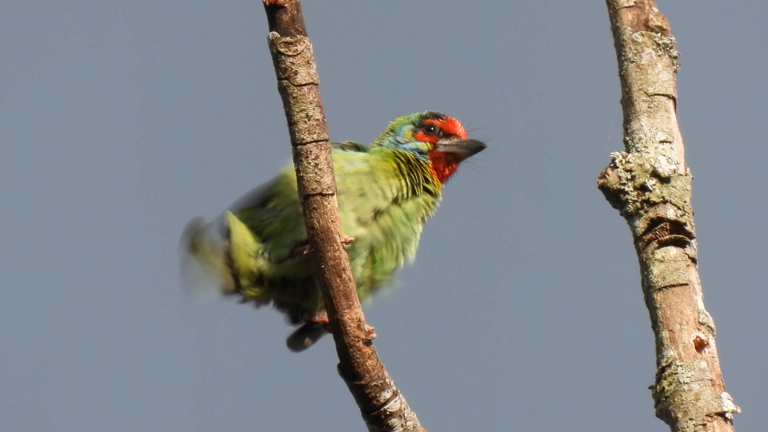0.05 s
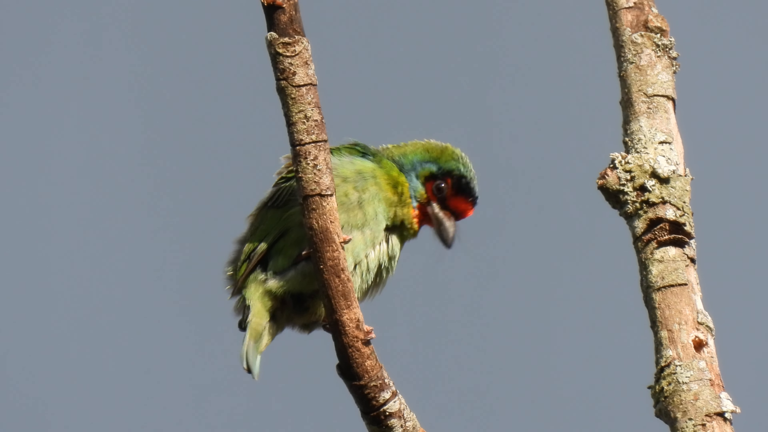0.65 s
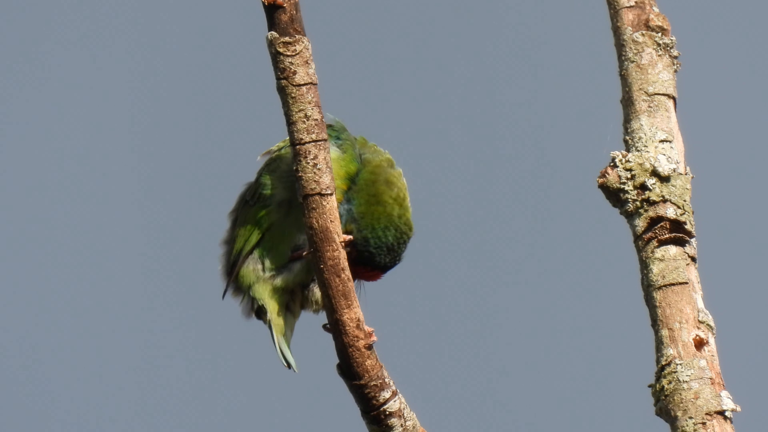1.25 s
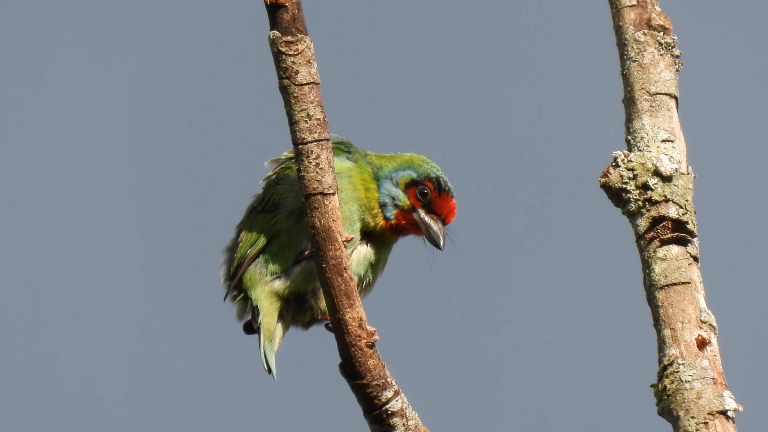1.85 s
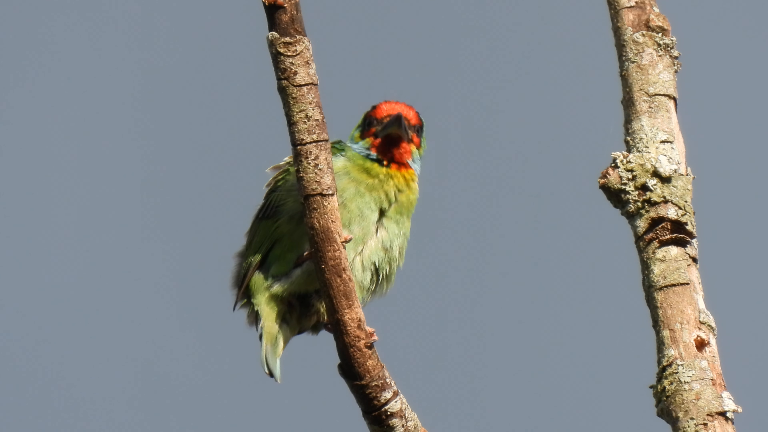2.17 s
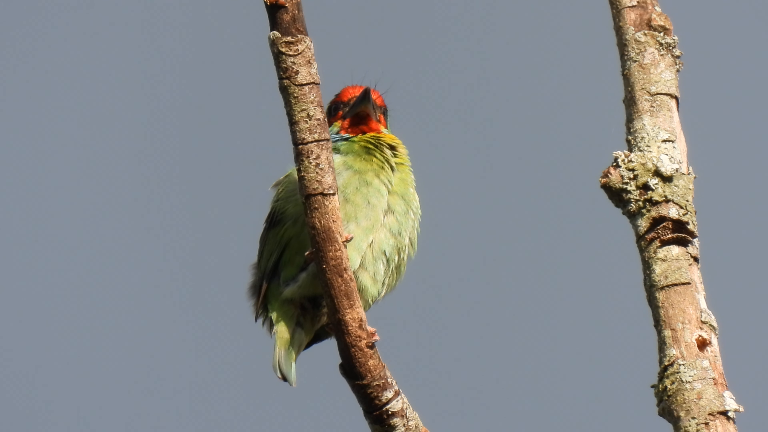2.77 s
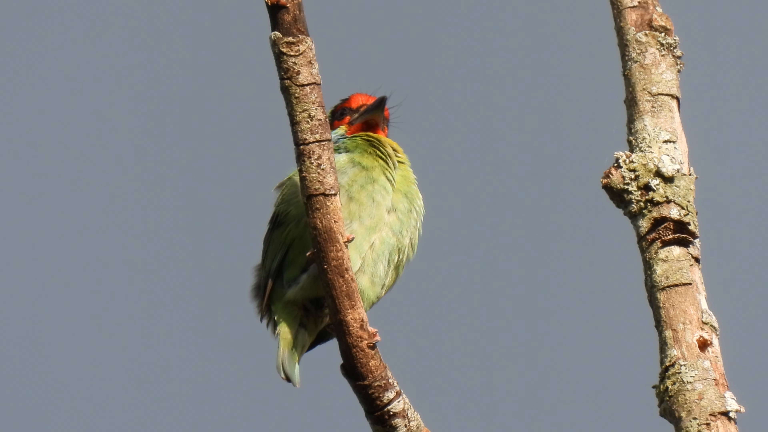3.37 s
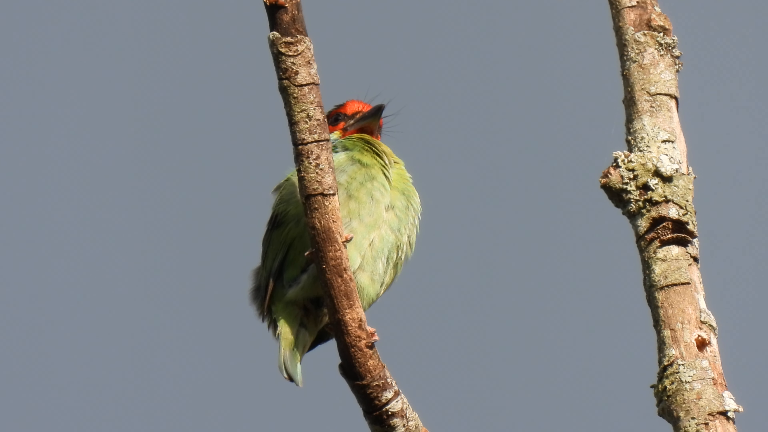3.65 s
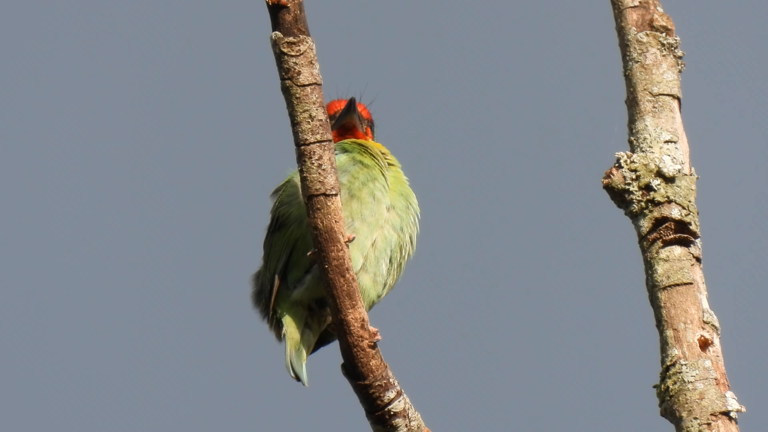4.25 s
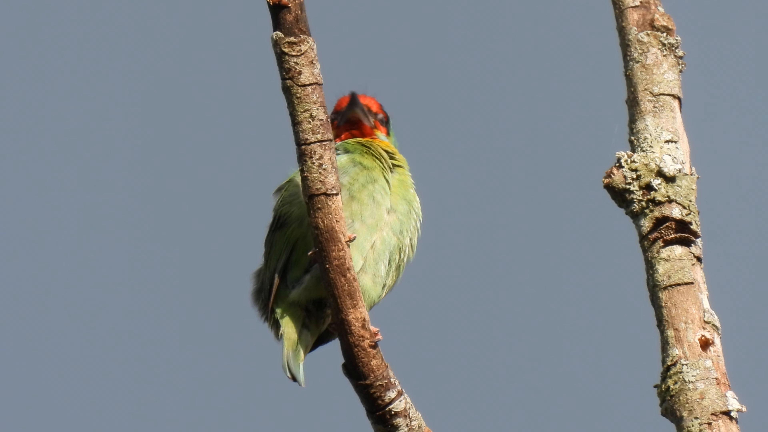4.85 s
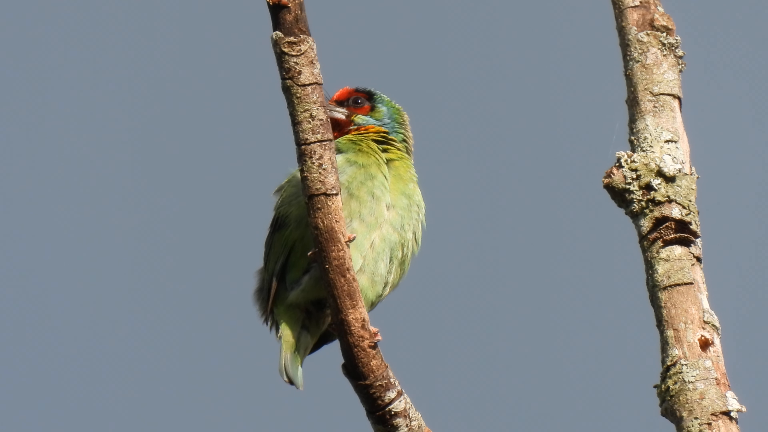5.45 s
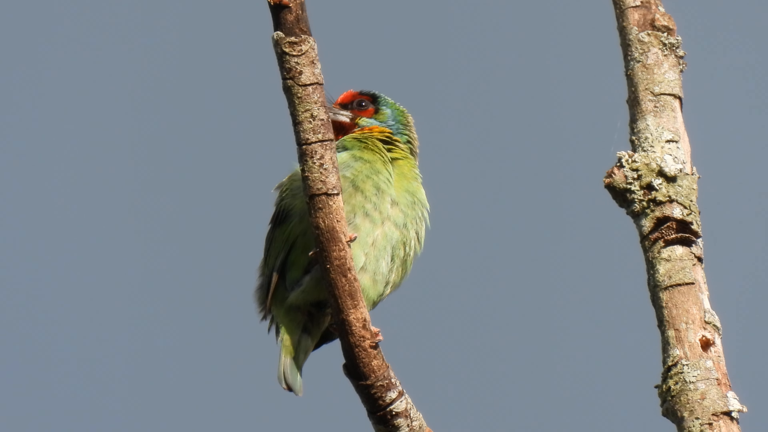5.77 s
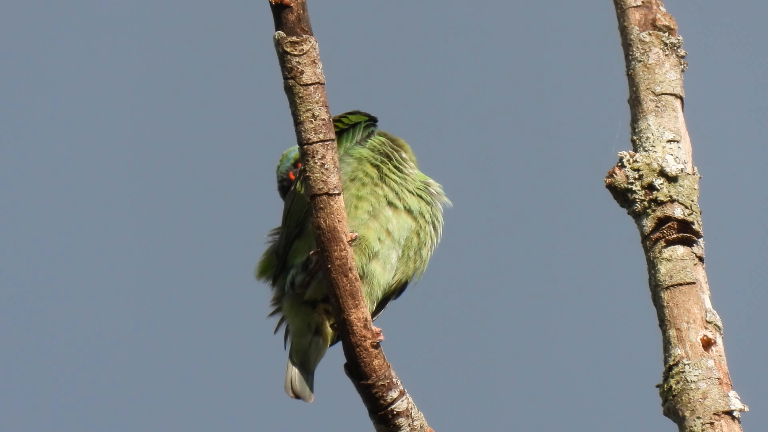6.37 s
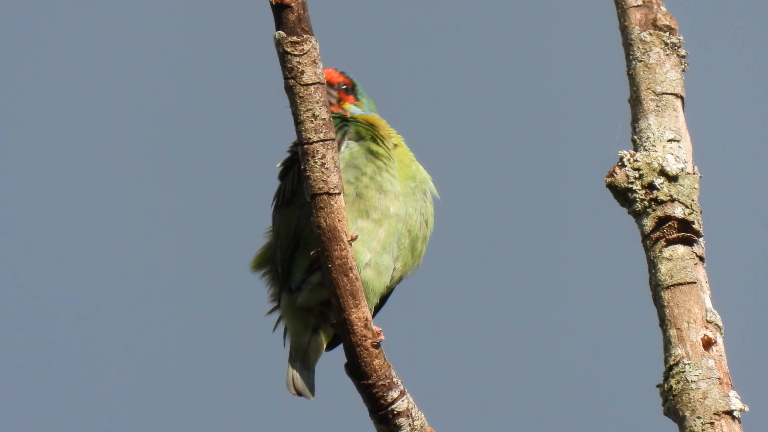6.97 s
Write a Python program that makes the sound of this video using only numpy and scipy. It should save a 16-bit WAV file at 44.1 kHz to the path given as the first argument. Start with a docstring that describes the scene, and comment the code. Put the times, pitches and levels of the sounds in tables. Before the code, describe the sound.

A barbet repeats a short rolling trill in a wood, while small birds chirp faintly over a soft high hiss.

```python
"""A wood. A near barbet repeats a rolling trill, mostly led in by a soft low note; a second answers twice.
Each voice is a swept syrinx tone, its harmonics weighted by the throat, with a breathy rasp.
Small birds chirp and whistle, a far bird hoots, a branch ticks once. Trunks echo and the wood rings on
over a steady hush and high hiss. A noise suppressor pulls the low hush down under every loud call."""
import sys
import numpy as np
from scipy import signal
from scipy.fft import rfft, irfft
from scipy.io import wavfile
from scipy.ndimage import uniform_filter1d

SR = 44100
rng = np.random.default_rng(int(sys.argv[2]) if len(sys.argv) > 2 else 0)


def put_to_file(sound):
    """Save the sound as 16-bit audio at rate SR, in the file named by the first command-line argument."""
    columns = np.atleast_2d(sound).T  # one column per channel
    safe = np.clip(columns, -1, 1)
    whole_steps = np.round(safe * 32767)
    wavfile.write(sys.argv[1], SR, whole_steps.astype(np.int16))


N = 317520

# Distant leaves and air. Each row: frequency in Hz, relative density in dB.
HUSH_SPECTRUM = [(30, -36), (90, -19.5), (150, -16), (240, -1), (500, 1.5), (850, 0), (1600, -0.5),
                 (2600, -3.5), (4500, -4), (6000, -5), (7200, -10.5), (8100, -1), (8800, 2.5), (9500, -19)]
# Stereo likeness of noise. Each row: frequency in Hz, left-right correlation.
NOISE_CORRELATION = [(60, .8), (200, 0.38), (400, 0.49), (1000, 0.55), (2500, 0.14), (5000, 0.05),
                     (9000, 0.049)]
# Ring of the wood. Each row: frequency in Hz, T60 in seconds.
WOOD_T60 = [(500, 0.47), (1150, 1.86), (2600, 0.98), (4500, 1.6), (9000, 1.8)]
# Trunk and ground echoes. Each row: delay in seconds, gain in dB, left minus right in dB.
ECHOES = [(.0048, -31, 3.5), (0.0125, -9.5, -6.5), (0.028, -20, 7), (0.04, -20, -6), (0.068, -16, 8.5)]

# Far chatter, loudest at first. Each row: time in seconds, level in dB.
CHATTER_ENVELOPE = [(0, -36), (.6, -49), (1, -59), (5.5, -51), (6.5, -59)]
# Short bird notes. Each row: start in seconds, length in seconds, middle pitch in Hz, relative level in dB.
HOOTS = [(1.660, 0.047, 850, -55.5), (1.770, 0.063, 850, -56.5), (1.870, 0.067, 859, -54.5),
         (1.985, 0.092, 871, -59.5)]  # low, far
BURRS = [(0, .11, 2667, -51.5), (.168, 0.019, 3580, -40.5), (.25, 0.33, 4710, -63),
         (.405, 0.032, 3490, -52.5), (.553, 0.027, 3410, -51), (1.92, 0.047, 3470, -63),
         (2.17, 0.13, 2596, -65.5), (3.115, 0.043, 3450, -55.5), (3.43, 0.016, 2040, -54.5),
         (3.53, 0.049, 2680, -59.5), (3.583, 0.014, 2860, -50.5), (4.645, 0.024, 2650, -51.5),
         (4.702, 0.021, 2460, -48), (4.99, 0.11, 3400, -57), (5.24, 0.15, 2250, -67.5),
         (5.915, 0.051, 2950, -57), (6.09, 0.11, 2370, -58.5)]  # blurred, deep among the trees
PIPS = [(.012, 0.021, 2550, -42), (.06, 0.094, 3250, -53.5), (.18, 0.014, 2436, -35),
        (.194, 0.015, 4255, -37.5), (.288, 0.027, 3360, -46.5), (.368, 0.044, 2860, -43.5),
        (.431, 0.022, 2503, -34.5), (.606, 0.034, 2675, -39), (.65, 0.094, 2000, -63),
        (.99, 0.062, 2043, -66), (1.175, 0.041, 3980, -53), (1.28, 0.067, 3970, -60.5),
        (3.197, 0.035, 2452, -41.5), (3.238, 0.027, 2613, -43.5), (3.235, 0.023, 2127, -46.5),
        (3.466, 0.029, 2543, -43), (3.745, 0.024, 2478, -44.5), (4.11, 0.061, 3040, -60.5),
        (4.65, .11, 3150, -59.5), (4.702, .025, 2600, -48.5), (4.72, 0.033, 1586, -62),
        (4.835, 0.029, 2380, -53.5), (5.005, 0.059, 2836, -47.5), (5.23, 0.047, 2286, -56),
        (5.728, 0.081, 3378, -55.5), (5.815, 0.062, 3370, -61), (5.935, 0.068, 3330, -58),
        (5.836, 0.035, 2475, -48)]  # nearly level
DOWNSLURS = [(.033, 0.02, 2290, -46), (.133, 0.038, 2824, -35), (.308, 0.032, 2670, -37.5),
             (.388, 0.038, 2795, -34.5), (.622, 0.045, 2830, -36), (3.147, 0.039, 2740, -47.5),
             (4.915, .034, 2846, -51.5), (5.32, 0.023, 2810, -55.5), (5.998, 0.07, 2990, -53.5)]  # gently falling
CHIPS = [(0, 0.0074, 1930, -41), (2.11, 0.035, 2380, -61), (2.285, 0.061, 2295, -66),
         (3.625, 0.01, 3390, -49.5), (3.625, 0.026, 2264, -62.5), (4.917, 0.016, 2040, -53),
         (6.085, 0.058, 2340, -65)]  # sharply falling
# First and last pitch as multiples of the middle pitch.
HOOT_BEND, BURR_BEND = (.93, .98), (1.05, .93)
PIP_BEND, DOWNSLUR_BEND, CHIP_BEND = (1.03, 1.01), (1.035, .94), (1.09, .9)
# Rising notes. Each row: start and length in seconds, first, middle and last pitch in Hz,
# relative level in dB.
UPSLURS = [(0.041, 0.048, 4070, 4500, 4770, -54.5), (0.977, 0.071, 2990, 3350, 4020, -61.5),
           (1.076, 0.04, 3150, 3755, 4150, -56), (1.089, 0.052, 1765, 2280, 2873, -57),
           (1.114, 0.041, 4206, 4730, 5130, -65), (1.138, 0.039, 3135, 3700, 3970, -51.5),
           (2.958, 0.037, 3235, 3875, 4444, -44.5), (3.348, 0.035, 2690, 3200, 3400, -49),
           (3.633, .05, 3910, 4240, 4350, -54), (4.436, 0.028, 2280, 2593, 2950, -44),
           (5.024, 0.044, 2154, 2460, 2730, -58), (5.028, 0.038, 4040, 4560, 5350, -60.5),
           (5.061, 0.075, 3300, 3955, 3990, -55.5), (5.174, 0.034, 3100, 3446, 3787, -58)]
THIN_WHISTLES = [(1.22, .14, 6610, 7110, 7230, -69), (1.977, 0.62, 4196, 4900, 5060, -68.5),
                 (4.804, .6, 4250, 4800, 4820, -70.5)]

# Barbet syrinx. Each row: harmonic number, relative level in dB.
HARMONICS = [(1, 0), (2, -7), (3, -22), (4, -22)]
# Swollen throat, favouring the fundamental. Each row: frequency in Hz, gain in dB.
THROAT_RESPONSE = [(700, 2), (950, -8), (1100, -0.5), (1280, -0.5), (1420, -4), (1700, -26), (1950, -9.5),
                   (2250, -13.5), (2750, -9.5), (3100, -19.5), (4000, -12), (4650, -14.5), (5300, -5.5),
                   (7500, -30)]
# Breath and hoarse bursts. Each row: frequency in Hz, relative density in dB.
RASP_SPECTRUM = [(150, -66), (650, -42.5), (1050, 8.5), (1800, -6.5), (2700, -1), (3400, -8), (4100, -8),
                 (4700, -8.5), (5300, -6.5), (6500, -4), (8000, -14.5)]
CRACK_SPECTRUM = [(300, -46.5), (800, -18.5), (1200, 1), (1600, -3.5), (1950, 2), (2300, -3), (2700, -3.5),
                  (3400, -18), (5300, -14), (8000, -25.5)]
# Second barbet, one list per call. Each row: time in seconds, pitch in Hz, relative level in dB.
ANSWERS = [
    [(.593, 1306, -36), (.604, 1241, -38), (.612, 1015, -29.5), (.622, 982, -31.5), (.638, 1140, -37),
     (.657, 1061, -54), (.674, 1148, -30.5), (.692, 1077, -51), (.712, 1122, -30.5), (.725, 1051, -35),
     (.742, 1113, -31.5), (.77, 1083, -45)],
    [(6.768, 1250, -43.5), (6.78, 1125, -48.5), (6.795, 942, -33), (6.808, 1126, -54), (6.818, 1050, -33),
     (6.83, 998, -37), (6.845, 1154, -35.5), (6.86, 990, -27), (6.872, 1029, -36), (6.885, 1161, -37),
     (6.905, 997, -39.5), (6.922, 1120, -41.5), (6.945, 1060, -59)],
]
# Soft lead-in note. Each row: offset in seconds, pitch in Hz, relative level in dB.
LEAD_IN = [(-.008, 1199, -16.5), (.004, 1027, 1.5), (.02, 987.4, -4), (.04, 955, -7.5), (0.059, 900, -8),
           (.085, 982, -10), (.1, 900, -15.5)]
# Caller's trills. Each row: start in seconds, pitch shift in Hz, time stretch, six roll levels in dB.
# The stretch scales the offsets in the next four tables.
TRILLS = [(.073, -4, 1.05, -33, -30, -28, -28.5, -34.5, -32),
          (1.469, 5, 1.04, -30.5, -29.5, -26.5, -27.5, -32, -34),
          (2.811, 8, 0.99, -30, -29, -27, -26.5, -29, -30),
          (4.169, -5, 1, -34, -31.5, -28.5, -29, -29.5, -27.5),
          (5.571, -14.5, .97, -31.5, -28.5, -30, -27.5, -28.5, -30),
          (6.992, -3.5, 0.98, -32.5, -31, -28.5, -29, -28.5, -35.5)]
# Hoarse bursts in a trill. Each row: offset in seconds, level in dB.
CRACKS = [(-.143, -56), (.001, -43), (.035, -46.5), (0.077, -45), (.116, -48), (.154, -54)]
# Rolls, narrowing along a trill. Each row: offset of the top in seconds, first, top and last pitch in Hz.
ROLLS = [(.009, 960, 1400, 1100), (.044, 1130, 1400, 1060), (.084, 980, 1375, 1070),
         (.122, 980, 1355, 1080), (.161, 1090, 1320, 1110), (.198, 1130, 1265, 1170)]
# One roll. Each row: offset from the top in seconds, share of the pitch swing, relative level in dB.
ROLL_ARCH = [(-.011, 0, -14), (-.005, .7, -8), (0, 1, -1.5), (.005, .82, 3), (.012, .25, -.5),
             (.017, .04, -2.5), (.023, 0, -9)]
# Drooping end of a trill. Each row: offset in seconds, pitch in Hz, level in dB against the last roll.
TRILL_ENDING = [(.228, 1173, -5), (0.247, 1141, -3.5), (0.26, 1020, -18), (.272, 932, -33)]

# Suppressor threshold. Each row: frequency in Hz, level in dB against the whole sound.
GATE_THRESHOLD = [(40, -50), (150, -47), (400, -43.5), (720, -44.5), (840, -67.5), (1100, -110)]

BARBET_PAN_DB, SONGBIRD_PAN_DB = .26, 2.5  # left minus right


def from_db(db):
    return 10 ** (np.asarray(db) / 20)


def at_hz(points, hz):
    """Interpolate along log frequency."""
    known_hz, values = np.transpose(points)
    return np.interp(np.log(np.maximum(hz, 1)), np.log(known_hz), values)


def panned(mono, pan_db):
    return mono * from_db([[pan_db / 2], [-pan_db / 2]])


def add(out, start_s, sound):
    at = max(0, round(start_s * SR))
    out[:, at:at + sound.shape[1]] += sound[:, :max(0, N - at)]


def flutter(size, rate_hz):
    """Smooth random wander, spread about 1."""
    return np.interp(np.arange(size) * rate_hz / SR, np.arange(1024), rng.standard_normal(1024))


def stereo_noise(size, spectrum, correlation=NOISE_CORRELATION):
    """Coloured, partly correlated noise, rms 1."""
    hz = np.fft.rfftfreq(size, 1 / SR)
    mid, side = rfft(rng.standard_normal((2, size)))
    alike = np.clip(at_hz(correlation, hz), -1, 1)
    both = np.sqrt(1 + alike) * mid + np.sqrt(1 - alike) * side * [[1], [-1]]
    noise = irfft(both * from_db(at_hz(spectrum, hz)), size)
    return noise / np.sqrt(np.mean(noise ** 2) + 1e-20)


def hush(level_db=-56, waver_db=.5):
    """Distant leaves and air, with a high hiss."""
    return stereo_noise(N, HUSH_SPECTRUM) * from_db(level_db + waver_db * flutter(N, rate_hz=11))


def wood_reverb(x, near_db, near_t60_s, far_db, correlation):
    """Scatter from near branches dies fast; the wood beyond rings on."""
    t = np.arange(2 * SR) / SR
    edges_hz = np.geomspace(500, 10000, 7)
    noises = [stereo_noise(len(t), [(100, 0)], [(100, correlation)]) for _ in range(2)]  # white
    near = from_db(-60 * t / near_t60_s) * (1 - np.exp(-t / .0037))
    near *= from_db(near_db) / np.linalg.norm(near)
    response = 0
    for k, (low_hz, high_hz) in enumerate(zip(edges_hz, edges_hz[1:])):
        bandpass = signal.butter(2, [low_hz, high_hz], "band", fs=SR, output="sos")
        far_t60_s = at_hz(WOOD_T60, np.sqrt(low_hz * high_hz))
        far = from_db(-60 * t / far_t60_s) * (1 - np.exp(-t / .034))
        far *= from_db(far_db) / np.linalg.norm(far)
        response += signal.sosfilt(bandpass, noises[k % 2]) * (near + far)
    return signal.fftconvolve(x, response, axes=1)[:, :N]


def trunk_echoes(x):
    """Direct sound plus reflections from trunks and ground."""
    out = x.copy()
    for delay_s, gain_db, pan_db in ECHOES:
        add(out, delay_s, panned(x, pan_db) * from_db(gain_db))
    return out


def branch_tick(start_s=5.478, level_db=-49, decay_s=.002):
    """One tiny, dry snap in the branches."""
    out = np.zeros((2, N))
    t = np.arange(SR // 20) / SR
    snap = stereo_noise(len(t), spectrum=[(2000, -20), (5000, 0), (10000, -3)])
    add(out, start_s, snap * from_db(level_db) * np.exp(-t / decay_s))
    return out


def whistles(notes, jitter, shimmer_db, buzz=0, full_buzz_hz_per_s=45000):
    """Near-pure tones bent through three pitches; buzz adds jitter to steep sweeps."""
    out = np.zeros((2, N))
    for start_s, length_s, first_hz, middle_hz, last_hz, level_db, pan_db in notes:
        size = max(64, round(length_s * SR))
        parabola = np.polyfit([0, .5, 1], [first_hz, middle_hz, last_hz], 2)
        steepness = min(1, abs(last_hz - first_hz) / length_s / full_buzz_hz_per_s) ** 4
        hz = np.polyval(parabola, np.linspace(0, 1, size))
        hz *= 1 + (jitter + buzz * steepness) * flutter(size, 900)
        envelope = signal.windows.tukey(size, .6) * from_db(level_db + shimmer_db * flutter(size, 150))
        tone = np.sqrt(2) * np.sin(2 * np.pi * np.cumsum(hz) / SR)
        add(out, start_s, panned(envelope * tone, pan_db))
    return out


def bent(notes, bend):
    """Expand each note's pitch to first, middle and last; append the pan."""
    return [(start_s, length_s, hz * bend[0], hz, hz * bend[1], db, SONGBIRD_PAN_DB)
            for start_s, length_s, hz, db in notes]


def with_pan(notes):
    return [(*note, SONGBIRD_PAN_DB) for note in notes]


def far_chatter(count, low_hz, high_hz):
    """Random chirps of birds deep in the wood."""
    notes = []
    for k, (when, span, height, sweep, faintness) in enumerate(rng.random((count, 5))):
        start_s, length_s = (k + when) / count * N / SR, .03 + .05 * span
        hz = low_hz * (high_hz / low_hz) ** height
        db = np.interp(start_s, *np.transpose(CHATTER_ENVELOPE)) - 6 * faintness
        notes.append((start_s, length_s, hz, hz * (.9 + .2 * sweep), hz * (.8 + .4 * sweep), db, 0))
    return whistles(notes, jitter=.07, shimmer_db=2)


def leaf_shaded(notes, knee_db, slope):
    """Faint birds sit behind more leaves: less direct sound."""
    return [(*note, db - slope * max(0, knee_db - db), pan_db) for *note, db, pan_db in notes]


def wood_carried(notes, pivot_db, slope):
    """Faint birds are far: more of their sound arrives via the wood."""
    return [(*note, db + slope * (pivot_db - db), pan_db / 2) for *note, db, pan_db in notes]


def songbirds():
    """Chirps, thin whistles, hoots, burrs and chatter, each with its share of reverb."""
    notes = bent(PIPS, PIP_BEND) + bent(DOWNSLURS, DOWNSLUR_BEND) + bent(CHIPS, CHIP_BEND)
    notes += with_pan(UPSLURS)
    thin = whistles(with_pan(THIN_WHISTLES), jitter=.022, shimmer_db=3)
    hoots = whistles(bent(HOOTS, HOOT_BEND), jitter=.004, shimmer_db=.5)
    chirps = whistles(leaf_shaded(notes, knee_db=-44, slope=.22), jitter=.007, shimmer_db=2.6, buzz=.035)
    burrs = whistles(bent(BURRS, BURR_BEND), jitter=.08, shimmer_db=3)
    direct = from_db(.5) * chirps + hoots + from_db(-.5) * burrs + from_db(-7) * thin
    send = whistles(wood_carried(notes, pivot_db=-35.5, slope=.25), jitter=.012, shimmer_db=2, buzz=.055)
    send += from_db(1.5) * hoots + from_db(3.5) * burrs + from_db(8) * thin
    send += far_chatter(count=110, low_hz=2046, high_hz=3217)
    return direct + wood_reverb(send, near_db=-6, near_t60_s=.15, far_db=-7.5, correlation=.53)


def barbet_voice(contours, overtone_db, throb, jitter, rasp_db, rough_rad):
    """The syrinx follows each (s, Hz, dB) contour; the throat weights the sweeping harmonics."""
    out = np.zeros((2, N))
    for contour in contours:
        times_s, pitch_hz, level_db = np.transpose(contour)
        t = np.arange(times_s[0], times_s[-1], 1 / SR)
        hz = uniform_filter1d(np.interp(t, times_s, pitch_hz), size=180)
        hz *= 1 + jitter * flutter(len(t), 900)
        phase = 2 * np.pi * np.cumsum(hz) / SR
        partials = []
        for k, db in HARMONICS:
            smear_rad = rough_rad * (k - 1) * flutter(len(t), 700)  # uneven cycles
            partials.append(from_db(db + at_hz(THROAT_RESPONSE, k * hz)) * np.sin(k * phase + smear_rad))
        rasp = stereo_noise(len(t), RASP_SPECTRUM)[0] * from_db(rasp_db)
        swell = from_db(np.interp(t, times_s, level_db))
        shallow_swell = swell.mean() * (swell / swell.mean()) ** throb
        voice = swell * partials[0] + shallow_swell * (from_db(overtone_db) * sum(partials[1:]) + rasp)
        fade = np.clip(np.minimum(t - t[0], t[-1] - t) / .005, 0, 1)
        add(out, times_s[0], panned(np.sqrt(2) * voice * fade, BARBET_PAN_DB))
    return out


def voice_cracks(length_s=.018):
    """The caller's voice breaks hoarsely before a note catches."""
    out, size = np.zeros((2, N)), round(length_s * SR)
    for start_s, _, stretch, *_ in TRILLS:
        for offset_s, level_db in CRACKS:
            burst = stereo_noise(SR // 10, CRACK_SPECTRUM)[0, :size] * np.hanning(size) * from_db(level_db)
            if start_s + offset_s > 0:
                add(out, start_s + stretch * offset_s - length_s / 2, panned(burst, BARBET_PAN_DB))
    return out


def lead_ins(ahead_s=.148, gain_db=-45):
    """A soft, rough note before each trill but the first."""
    contours = [[(start_s - ahead_s + s, hz, gain_db + db) for s, hz, db in LEAD_IN]
                for start_s, *_ in TRILLS if start_s > ahead_s]
    return barbet_voice(contours, overtone_db=3, throb=.8, jitter=.08, rasp_db=-10.5, rough_rad=.6)


def trill_contour(start_s, shift_hz, stretch, *levels_db):
    """Six arching rolls, then the drooping end."""
    rows = []
    for (top_s, first_hz, top_hz, last_hz), level_db in zip(ROLLS, levels_db):
        for s, share, db in ROLL_ARCH:
            foot_hz = first_hz if s < 0 else last_hz
            rows.append((top_s + s, foot_hz + share * (top_hz - foot_hz), level_db + db))
    rows += [(s, hz, levels_db[-1] + db) for s, hz, db in TRILL_ENDING]
    return [(start_s + stretch * s, hz + shift_hz, db) for s, hz, db in sorted(rows)]


def barbets(left_lag_samples=2):
    """The caller is near and fairly dry; the answer is lower, purer and deeper among the trees."""
    contours = [trill_contour(*row) for row in TRILLS]
    trills = barbet_voice(contours, overtone_db=0, throb=.15, jitter=.007, rasp_db=-28, rough_rad=.33)
    caller = trills + voice_cracks() + lead_ins()
    answer = barbet_voice(ANSWERS, overtone_db=-11, throb=.36, jitter=.021, rasp_db=-28.5, rough_rad=.7)
    caller_ring = wood_reverb(caller, near_db=-11.5, near_t60_s=.22, far_db=-12, correlation=.35)
    answer_ring = wood_reverb(answer, near_db=-10, near_t60_s=.3, far_db=-7, correlation=.75)
    left, right = trunk_echoes(caller) + caller_ring + answer + answer_ring
    return np.array([np.pad(left, (left_lag_samples, 0))[:N], right])


def scene():
    return barbets() + songbirds() + branch_tick() + hush()


def suppress_lows(x, depth_db, follow_s):
    """Each narrow low band closes when weak against the whole sound."""
    frame, hop = 2048, 512
    hz, _, bands = signal.stft(x, SR, nperseg=frame, noverlap=frame - hop)
    power = np.mean(np.abs(bands) ** 2, axis=0) + 1e-20
    pole = np.exp(-hop / SR / follow_s)
    total_power = signal.lfilter([1 - pole], [1, -pole], power.sum(axis=0))
    threshold = from_db(at_hz(GATE_THRESHOLD, hz))[:, None] ** 2 * total_power
    gain = np.maximum(power / (power + threshold), from_db(-depth_db))
    return signal.istft(bands * gain, SR, nperseg=frame, noverlap=frame - hop)[1][:, :N]


def record(dry):
    """Noise suppression, then a steep top cut."""
    quieted = suppress_lows(dry, depth_db=20.5, follow_s=.025)
    cutoff_hz = 10050
    return signal.sosfilt(signal.ellip(10, .1, 80, cutoff_hz, fs=SR, output="sos"), quieted)


dry = scene()
out = record(dry)
put_to_file(out)
```